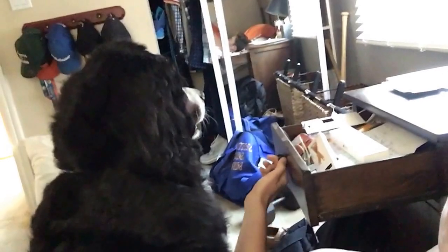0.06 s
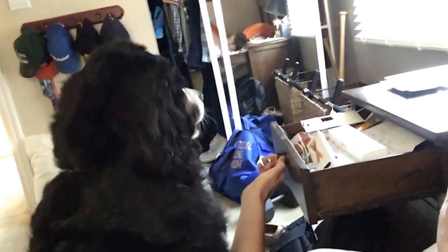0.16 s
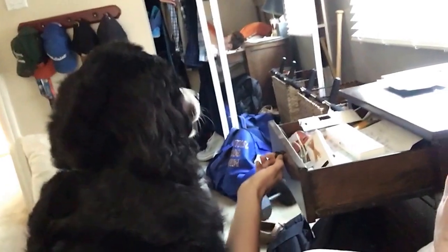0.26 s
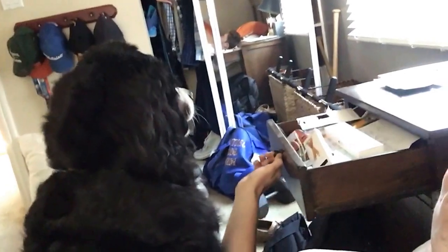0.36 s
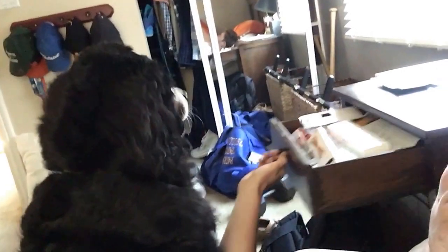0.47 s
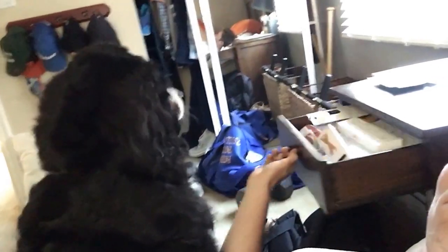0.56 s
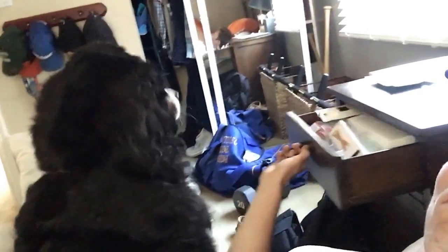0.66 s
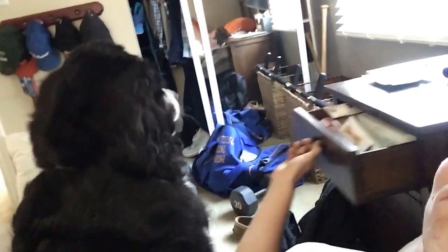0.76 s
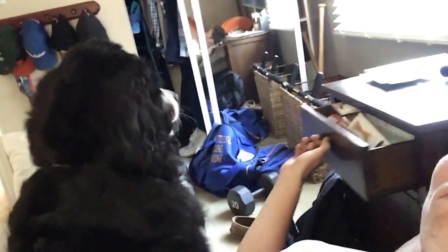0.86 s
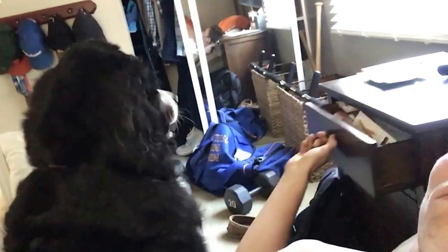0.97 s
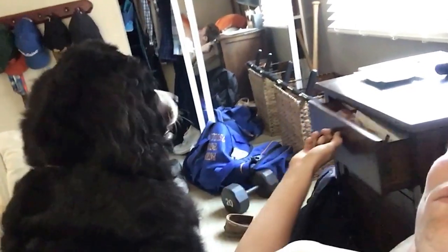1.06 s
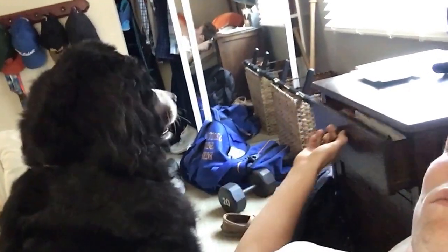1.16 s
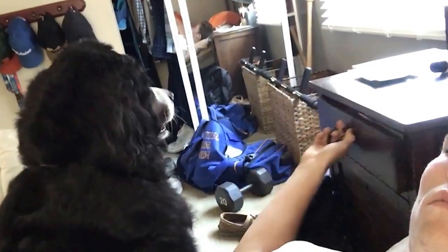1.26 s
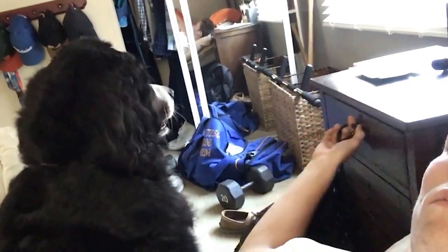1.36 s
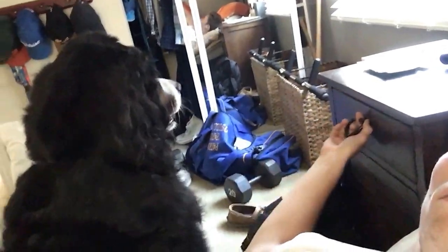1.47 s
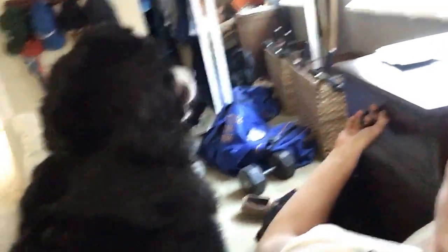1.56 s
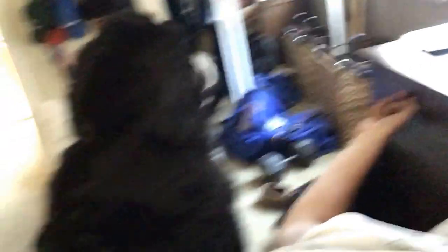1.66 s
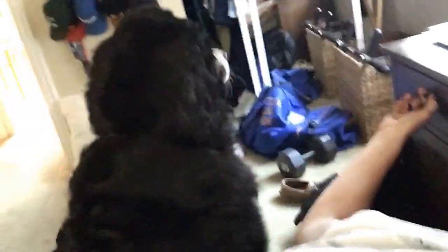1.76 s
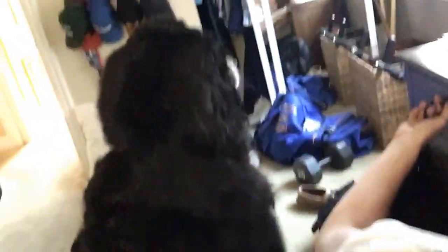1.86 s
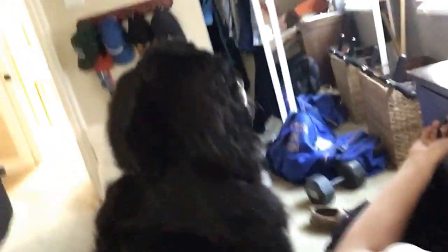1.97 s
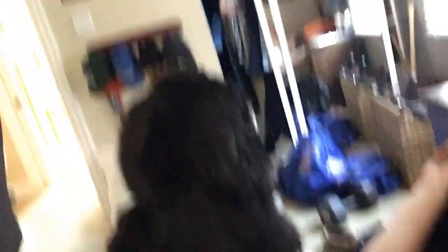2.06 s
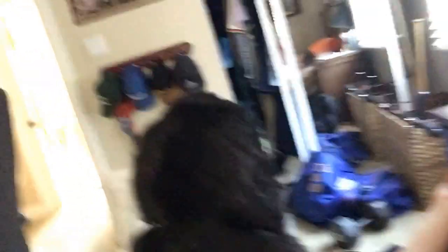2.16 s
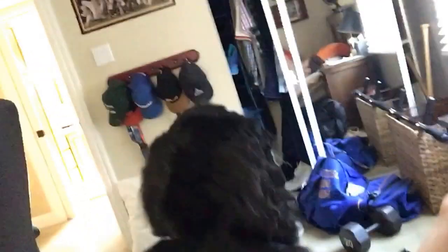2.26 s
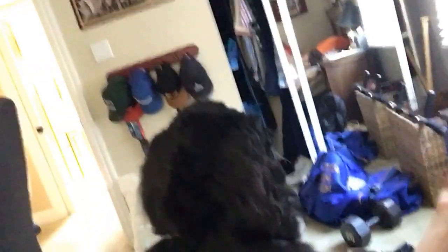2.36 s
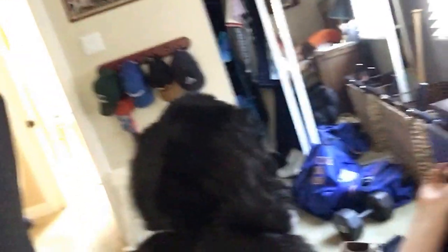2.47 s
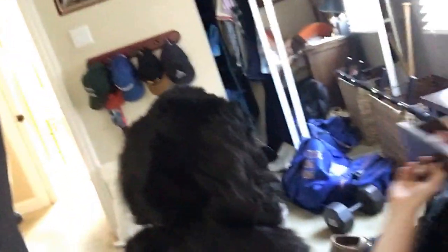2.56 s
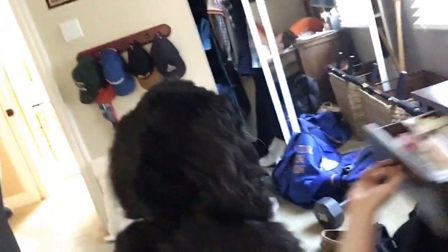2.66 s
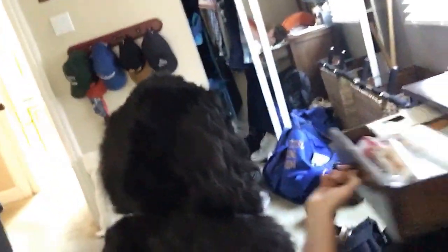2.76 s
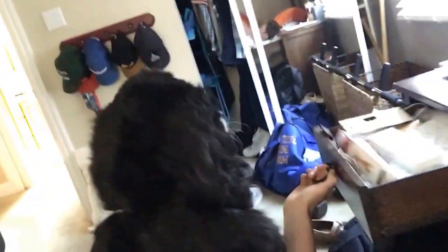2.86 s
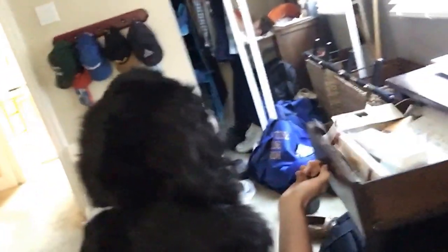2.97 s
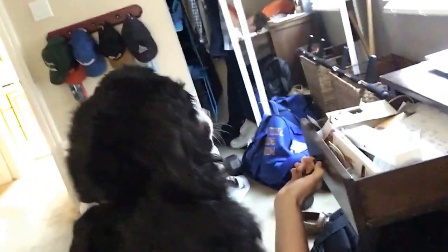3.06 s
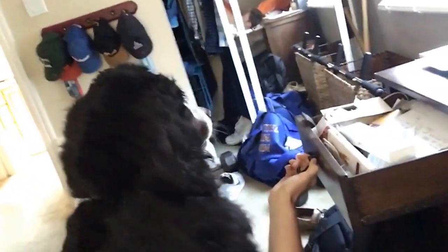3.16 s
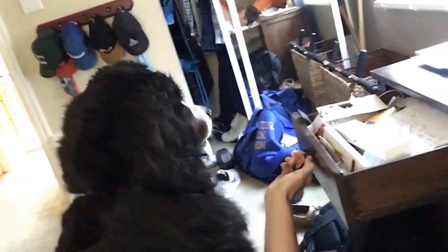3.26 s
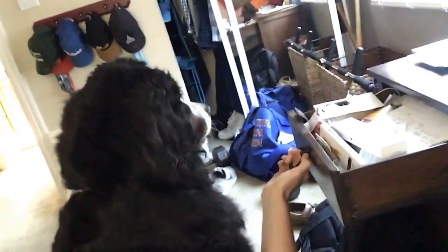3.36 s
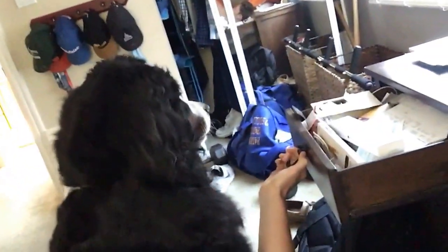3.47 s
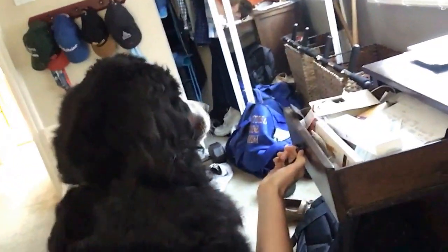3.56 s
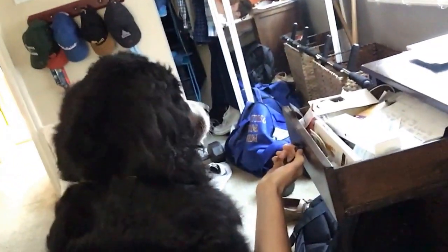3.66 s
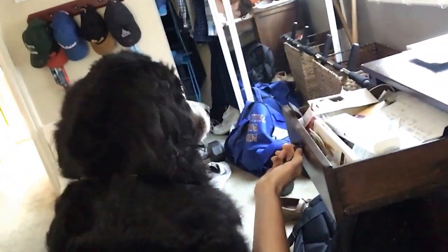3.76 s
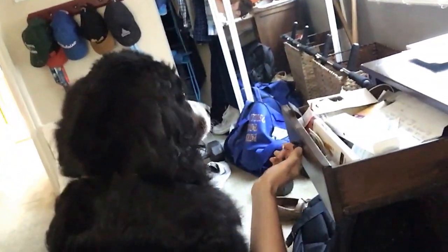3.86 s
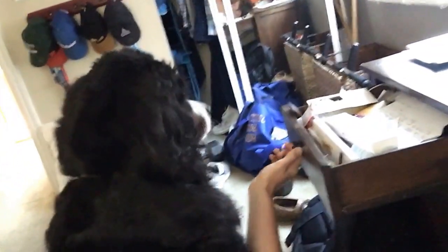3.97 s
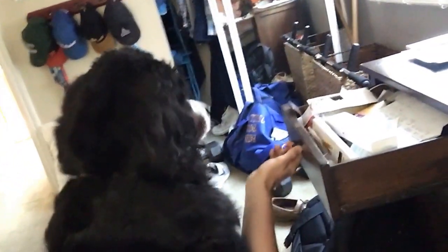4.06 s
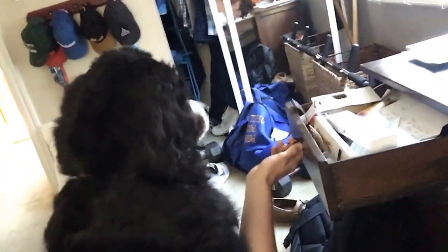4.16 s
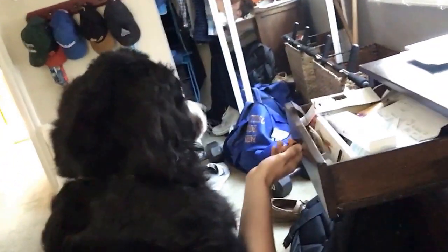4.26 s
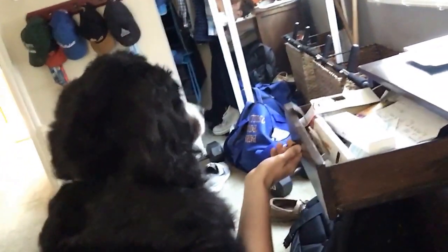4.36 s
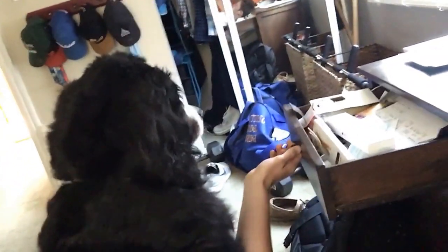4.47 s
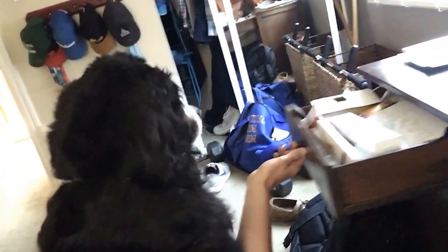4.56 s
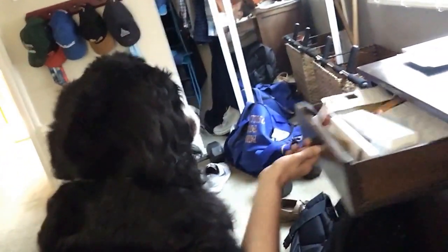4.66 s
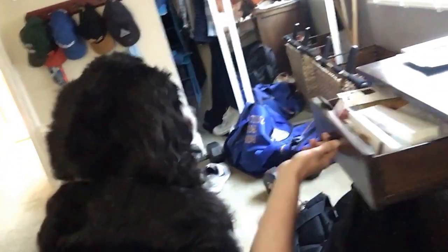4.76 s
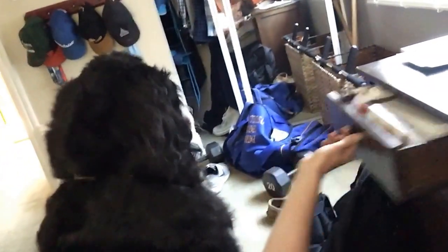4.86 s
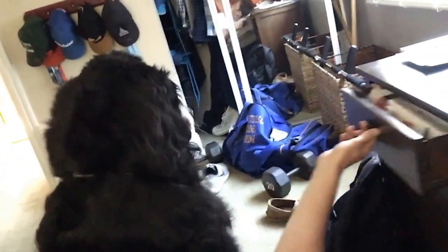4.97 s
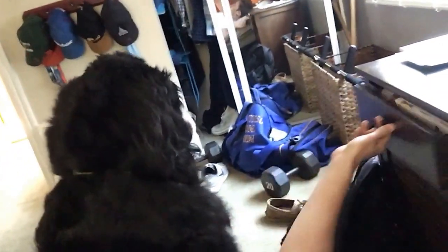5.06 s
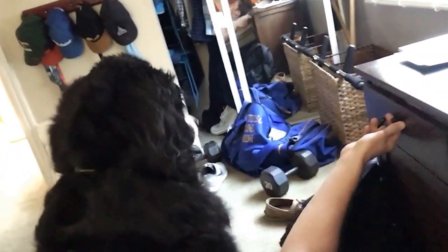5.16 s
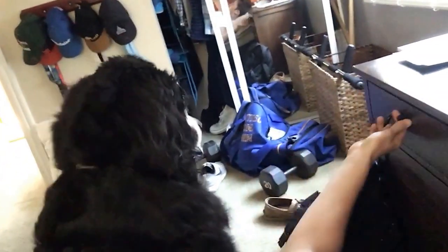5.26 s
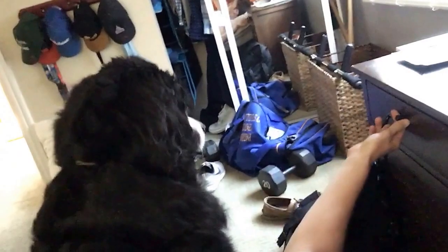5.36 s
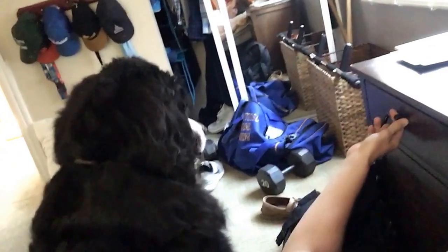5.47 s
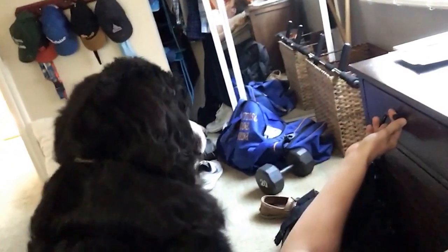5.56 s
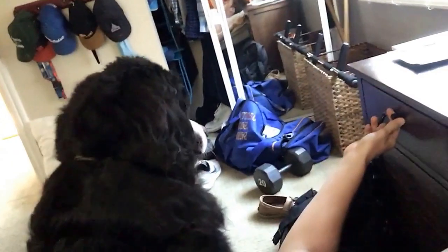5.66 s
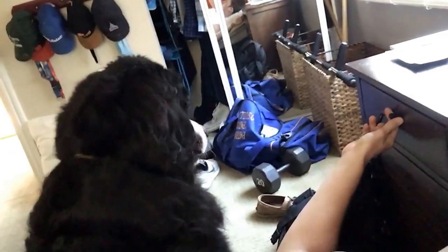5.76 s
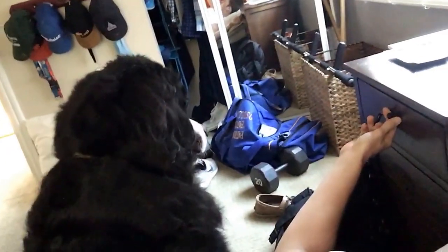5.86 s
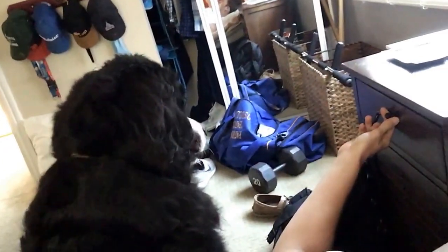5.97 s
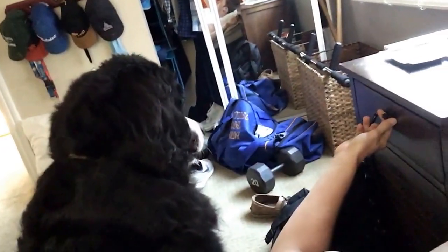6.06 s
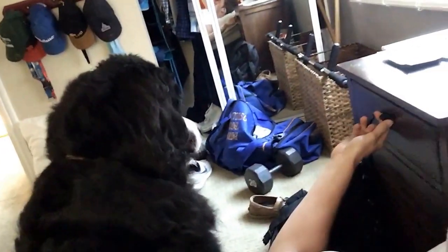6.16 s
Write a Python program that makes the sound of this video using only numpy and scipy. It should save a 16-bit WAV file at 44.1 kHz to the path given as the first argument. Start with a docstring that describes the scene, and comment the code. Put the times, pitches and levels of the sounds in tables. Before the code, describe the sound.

Heard at arm's length: a heavy drawer slides closed on dry runners, knocks, and something loose rocks hollowly. Near-silence with faint hum, then a quick swelling scrape and a very loud, bright wooden slam with rattling contents. Fingers click lightly on the pull; the drawer rasps and ticks back in, closing with a low thump. The bedroom adds a brief tail.

```python
"""Wooden desk drawer on its runners

A wooden drawer in a bedroom is pushed shut, pulled hard against its stop, and pushed shut again.
Rolling and scraping are trains of random slips, filtered and scaled by the effort of each stroke.
Stops, crashes, bumps and taps are blows: damped modes of the desk with noisy clacks and cracks.
A loose object rocks with hollow notes after each stroke; fingers click on the pull, and bright ticks
are scattered through. Room reflections, still air and a faint hum surround it all."""
import sys
import numpy as np
from scipy import signal
from scipy.fft import rfft, irfft
from scipy.io import wavfile
from scipy.ndimage import uniform_filter1d

SR = 44100
rng = np.random.default_rng(int(sys.argv[2]) if len(sys.argv) > 2 else 0)


def store_pcm(level_fs):
    """Save levels as 16-bit WAV."""
    pcm = np.round(np.clip(level_fs, -1, 1) * 32767).astype(np.int16)
    wavfile.write(sys.argv[1], SR, np.atleast_2d(pcm).T)


N = 273861

# Relative power spectra per Hz of the desk's rumble, of struck wood, and of a hard contact:
# frequency_hz, level_db
RUMBLE_SPECTRUM = [(20, -36), (35, -16), (60, -3), (90, -1), (125, 5), (190, 0.5), (260, -9.5),
                   (400, -19.5), (520, -38), (1200, -60.5)]
CLACK_SPECTRUM = [(100, -24.5), (260, 4), (400, -1), (520, -4), (700, -1), (1000, -1.5), (1250, -3),
                  (1600, -2), (2100, -6), (2800, -7), (5000, -32), (12000, -53.5)]
CRACK_SPECTRUM = [(1200, -23), (2500, -2), (3300, 0), (4250, 3), (5100, -5.5), (6300, -6), (7500, -15),
                  (8400, -17.5), (10500, -21), (14500, -22), (16000, -28.5)]


def amp(db):
    """Level law: converts decibels to an amplitude ratio."""
    return 10 ** (np.asarray(db) / 20)


def unit(x):
    """Normalization of power: scales a signal to an rms of 1."""
    return x / np.sqrt(np.mean(x ** 2) + 1e-20)


def read(points, hz):
    """Logarithmic frequency scale: interpolates (Hz, value) points along it."""
    f, value = np.transpose(points)
    return np.interp(np.log(hz + 1), np.log(f + 1), value)


def add(mix, s, sound):
    """Superposition: adds a sound to the mix from time s on, in place."""
    part = mix[max(round(s * SR), 0):][:len(sound)]
    part += sound[:len(part)]


def colour(x, points, peak_hz=1000, peak_db=0, size=4096):
    """Minimum-phase filtering by a spectrum and an optional broad resonance; white noise keeps its power."""
    hz = abs(np.fft.fftfreq(size, 1 / SR))
    resonance = peak_db / (1 + (np.log2((hz + 1) / peak_hz) / 1.2) ** 2)
    log_gain = np.log(amp(read(points, hz) + resonance))
    # the Hilbert transform of the log gain supplies the phase of a causal filter
    taps = np.fft.ifft(np.exp(np.conj(signal.hilbert(log_gain)))).real
    return signal.oaconvolve(x, taps / np.linalg.norm(taps))[:len(x)]


def ring(modes, rise):
    """Modal decay: damped sines of alternating sign that swell from rest over the time of contact."""
    t = np.arange(SR // 2) / SR
    sound = np.zeros(len(t))
    for k, (hz, db, t60) in enumerate(modes):
        sound += (-1) ** k * amp(db - 60 * t / t60) * np.sin(2 * np.pi * hz * t)
    initial_rms = np.sqrt(sum(amp(db) ** 2 for _, db, _ in modes) / 2)  # without the swell
    return sound * (1 - np.exp(-t / rise)) / initial_rms


def burst(decay):
    """Contact noise: a quick swell and a dying chatter of uneven bounces, of the same energy for any decay."""
    t = np.arange(SR // 8) / SR
    sizes_db = np.repeat(rng.standard_normal(len(t)), SR // 1000)[:len(t)]  # a new size every millisecond
    envelope = np.exp(-t / max(decay, 1e-4)) * (1 - np.exp(-t / .0004))
    sound = rng.standard_normal(len(t)) * amp(0.81 * sizes_db) * envelope
    return sound / np.linalg.norm(sound) * np.sqrt(0.0027 * SR)


def waver(hz):
    """Band-limited fluctuation: random motion of rms 1 with no component at or above hz."""
    spectrum = rfft(rng.standard_normal(N))
    return unit(irfft(spectrum * (np.fft.rfftfreq(N, 1 / SR) < hz), N))


def slips(per_s, spread_db):
    """Stick-slip friction as a random impulse train: tiny slips of chance size, scaled to an rms of 1."""
    size = amp(spread_db * np.minimum(rng.exponential(1, N), 3.5))
    happens = rng.random(N) < per_s / SR
    return unit(size * rng.standard_normal(N) * happens)


def controls():
    """Driven motion: effort and extra hiss of dry wood over time, in dB, fading outside each stroke."""
    # The drawer on its runners, one curve a stroke: time_s, effort_db, dryness_db
    push_shut = [(0.36, -47.5, 20.5), (0.46, -24, 0.5), (0.54, -11.5, 0.5), (0.7, -8.5, 0), (0.9, -18, 5),
                 (1.12, -20, 2), (1.24, -10, 4.5), (1.32, -13, 2.5), (1.39, -14.5, -3)]
    pull_open = [(2.2, -43.5, 16), (2.32, -26.5, -3), (2.41, -20.5, 4), (2.52, -10, 2.5),
                 (2.62, -2.5, -0.5), (2.75, 1, 4), (2.85, 1.5, -4)]
    push_again = [(4.12, -42.5, 1.5), (4.5, -38, 7), (4.63, -12, 2), (4.76, -9.5, -7.5), (4.86, -11, 8.5),
                  (5.01, -12.5, -0.5), (5.11, -7, 5), (5.18, -2, 11), (5.249, -10, 1), (5.33, -7, 5)]
    coast_db_per_s = 397.5  # fall of the effort outside a stroke
    t = np.arange(N) / SR
    strokes = push_shut, pull_open, push_again
    s, effort, dryness = np.concatenate(strokes).T
    # time to the nearest stroke, zero inside one
    idle_s = np.min([abs(t - np.clip(t, stroke[0][0], stroke[-1][0])) for stroke in strokes], axis=0)
    return np.interp(t, s, effort) - coast_db_per_s * idle_s, np.interp(t, s, dryness)


def slide():
    """Rolling and sliding friction: rumble, scrape, hiss and grit snaps; bumps in the track sway them together."""
    # Relative power spectra per Hz of the scraping runners and of their hiss: frequency_hz, level_db
    scrape_spectrum = [(150, -25), (330, -3.5), (400, 4), (500, -2.5), (660, 2), (800, -9), (950, 1),
                       (1250, 2.5), (1650, -5), (2100, -6), (2800, -13), (5000, -42), (12000, -65.5)]
    hiss_spectrum = [(1200, -36), (2600, 4.5), (3400, 2), (4200, -2), (5000, -6.5), (6300, -10.5),
                     (7600, -20), (9500, -19.5), (11000, -22), (15500, -24)]
    effort, dryness = controls()
    grit = slips(per_s=110, spread_db=2.74)
    rolling = slips(per_s=1700, spread_db=2.0)
    scraping = slips(per_s=1600, spread_db=-0.5) + 0.42 * grit
    hissing = slips(per_s=3400, spread_db=0.0) + 0.49 * grit
    # the factor on the effort is how closely a layer follows it, in dB per dB
    rumble = amp(-40.5 + 0.76 * effort) * colour(rolling, RUMBLE_SPECTRUM)
    scrape = amp(-47 + effort) * colour(scraping, scrape_spectrum)
    hiss = amp(-58 + effort + dryness) * colour(hissing, hiss_spectrum)
    # single grains snap under the runners and follow the effort only loosely
    grains = slips(per_s=85, spread_db=0.0)
    grain_clack = colour(grains, CLACK_SPECTRUM, peak_hz=1900, peak_db=9)
    snaps = amp(-64 + 0.75 * effort + dryness) * (colour(grains, CRACK_SPECTRUM) + 0.7 * grain_clack)
    return (rumble + scrape + hiss + snaps) * amp(2.6 * waver(hz=47.84))


def blow(thump_db, clack_db, crack_db, hz, chatter):
    """Impact excitation: a thump in the desk's modes, a clack in the struck piece and a crack at the contact."""
    # Low modes of the desk: frequency_hz, relative_level_db, t60_s
    desk_modes = [(62, -3.5, 0.26), (82.45, -8.5, 0.24), (109.3, 1.5, 0.1), (132.4, 1.5, 0.14),
                  (151.2, -1.5, .15), (196, -4.5, 0.32), (237, -2.5, 0.11), (309, -4.5, .1),
                  (397, -11.5, 0.1)]
    out = amp(thump_db) * ring(desk_modes, rise=.003)
    add(out, 0, amp(clack_db + 1) * colour(burst(chatter), CLACK_SPECTRUM, peak_hz=hz, peak_db=11.5))
    add(out, 0, amp(crack_db - 2) * colour(burst(0.55 * chatter), CRACK_SPECTRUM))
    return out


def rattle():
    """Multiple collisions: small hits among the jolted contents build up and die away."""
    rise_s, fall_db_per_s = 0.06, 191
    t = np.arange(SR // 2) / SR
    hits = slips(per_s=280, spread_db=-1.5)[:len(t)] * np.minimum(t / rise_s, 1)
    hits = hits * amp(-fall_db_per_s * np.maximum(t - rise_s, 0))
    clack, crack = colour(hits, CLACK_SPECTRUM), colour(hits, CRACK_SPECTRUM)
    return clack + amp(-10) * crack + amp(-9) * colour(hits, RUMBLE_SPECTRUM)


def stops(count=3):
    """Inelastic rebound: each end-stop blow repeats weaker, lower and duller while the contents rattle."""
    # The drawer reaches the end of its travel, levels relative:
    # start_s, thump_db, clack_db, crack_db, pitch_hz, rattle_db
    travel_ends = [(1.403, -23.5, -30, -34.5, 750, -53.5), (1.655, -47, -53.5, -71, 940, -68.5),
                   (2.854, -22.5, -21, -25, 1320, -31.5), (5.289, -24.5, -30, -42, 560, -49)]
    rebound_s, chatter_s, pitch_ratio = 0.0075, 0.011, 0.88
    thump_step_db, clack_step_db, crack_step_db = -11.5, -3, -5.5  # change at each rebound
    out = np.zeros(N)
    for s, thump_db, clack_db, crack_db, hz, rattle_db in travel_ends:
        for k in range(count):
            thump = thump_db + k * thump_step_db
            clack = clack_db + k * clack_step_db
            crack = crack_db + k * crack_step_db
            add(out, s + k * rebound_s, blow(thump, clack, crack, hz * pitch_ratio ** k, chatter_s))
        add(out, s, amp(rattle_db) * rattle())
    return out


def crashes():
    """Inertia: at full reach the contents are thrown against each other and the drawer's front."""
    # Collisions of the contents, levels relative: start_s, clack_db, crack_db, pitch_hz
    collisions = [(2.849, -25.5, -33, 1350), (2.871, -21.5, -21, 400), (2.882, -12, -11.5, 1460),
                  (2.891, -25.5, -12, 1274), (2.904, -14.5, -27, 710), (2.913, -17, -26, 1037),
                  (2.928, -26, -33.5, 1437)]
    out = np.zeros(N)
    for s, clack_db, crack_db, hz in collisions:
        add(out, s, blow(-38, clack_db, crack_db, hz, chatter=0.0086))
    return out


def catches():
    """Modal resonance: the stop at full reach sets the drawer's panels ringing."""
    # Moments at which the panels are caught: start_s, relative_level_db
    catch_times = [(2.882, -27.5), (2.904, -11), (2.913, -13)]
    # Modes of the drawer's panels and runners: frequency_hz, relative_level_db, t60_s
    panel_modes = [(607, -5, .05), (675, -4, .05), (783, 2, .06), (902, -9, .06), (1016, -6, .06),
                   (1062, -6, .06), (1113, -3, .07), (1468, -7, .06), (1590, -7, .06), (1668, -7, .05),
                   (4005, -14, .07), (4374, -12, .08)]
    out = np.zeros(N)
    for s, db in catch_times:
        add(out, s, amp(db - 4.5) * ring(panel_modes, rise=.0015))
    return out


def bumps():
    """Impulsive rolling contact: the rollers jolt over bumps in the track."""
    # Jolts, the thump and crack relative to the clack:
    # start_s, relative_level_db, thump_db, crack_db, pitch_hz, chatter_s
    jolts = [(0.524, -51.5, 3, -9, 1100, 0.01), (0.619, -45.5, 4.5, -16, 1300, 0.024),
             (0.797, -41.5, -16, -4, 1900, .004), (0.822, -35, -1.5, 2, 2300, 0.0027),
             (0.949, -43.5, -5.5, -9, 1230, 0.0033), (1.164, -50, -21, -1, 1460, 0.0062),
             (1.22, -44.5, -9, -7, 1610, 0.0053), (2.544, -40, -26, -0.5, 990, 0.0051),
             (2.705, -40.5, 0, -7, 1200, 0.0083), (2.717, -32.5, -15, -15, 1240, .02),
             (4.661, -30.5, -30, -15, 1370, 0.0053), (4.739, -45.5, 5, -19, 1090, 0.006),
             (4.805, -37.5, -6, -10.5, 1180, 0.014), (4.908, -32, -3, -3, 1510, 0.0051),
             (4.95, -41.5, -24, -0.5, 1400, 0.0084), (5.049, -36.5, -12, -10, 1480, 0.0027),
             (5.095, -38.5, -13, -8, 1690, 0.0022), (5.157, -32, -3, 0.5, 1630, 0.022)]
    out = np.zeros(N)
    for s, db, thump_db, crack_db, hz, chatter in jolts:
        add(out, s, blow(db + thump_db, db, db + crack_db, hz, chatter))
    return out


def taps():
    """Weak impact: things shift in the drawer and the hand brushes its front, hardly moving the desk."""
    # Light blows, the crack relative to the clack:
    # start_s, relative_level_db, crack_db, pitch_hz, chatter_s
    light_blows = [(0.052, -55, -30, 840, .008), (0.379, -58, -3, 1130, 0.024),
                   (1.477, -35.5, -12.5, 700, 0.0074), (2.249, -59, -13, 1140, 0.012),
                   (2.302, -61, -1, 2500, 0.0066), (2.346, -54, -24, 450, 0.0081),
                   (3.155, -34.5, -30, 792, 0.021), (3.293, -48.5, -22, 450, .02),
                   (3.875, -53, -17, 1080, 0.0096), (4.133, -56.5, -4, 1100, 0.021),
                   (4.226, -51, -7.5, 1040, 0.0081), (4.466, -57, -2, 1140, .011),
                   (4.512, -57, 2.5, 1900, 0.022), (5.402, -44.5, -29, 1000, 0.0059),
                   (5.462, -44, -22, 648, 0.015), (6.075, -60.5, -18, 1060, 0.028),
                   (6.124, -57.5, -20, 1220, 0.012)]
    out = np.zeros(N)
    for s, db, crack_db, hz, chatter in light_blows:
        add(out, s, blow(db - 12.5, db, db + crack_db, hz, chatter))
    return out


def rocking(count=2):
    """Energy loss in rocking: each landing gives a scuff and a hollow note, weaker and higher than the last."""
    # Swings of a loose object over and back: first_landing_s, relative_level_db, pitch_hz
    swings = [(1.519, -35.5, 264), (1.603, -47, 294), (3.163, -29, 228.5), (3.21, -35.5, 254),
              (3.297, -38.5, 321), (5.468, -36, 275), (5.563, -39.5, 238), (5.636, -50, 339)]
    # Relative power spectrum per Hz of the dull scuff: frequency_hz, level_db
    scuff_spectrum = [(150, -15), (380, -2.5), (700, -2), (1100, -4.5), (1700, -12), (4000, -30.5),
                      (9000, -50)]
    gap_s, loss_db, climb = 0.025, 2, 0.032  # per landing; the climb is a share of the first pitch
    out = np.zeros(N)
    for start, first_db, first_hz in swings:
        for k in range(count):
            s = start + k * gap_s
            db = first_db - k * loss_db
            hz = first_hz * (1 + k * climb)
            note = ring([(hz, 0, .09), (hz * 1.38, -8, .07)], rise=0.0024)
            add(out, s - .003, amp(db - 3.5) * note)  # the note leads the scuff slightly
            add(out, s, amp(db - 9.0) * colour(burst(decay=0.035), scuff_spectrum))
    return out


def pull():
    """Impact on a small resonator: a finger's tap rings the pull, with a crack and a clack of the front."""
    # Finger taps; soft touches ring lower: start_s, relative_level_db, pitch_hz, brightness_db
    finger_taps = [(1.987, -55, 464, -23), (4.164, -33, 1260, -4.5), (4.354, -40, 838, -27)]
    # Modes of the pull: pitch_multiple, relative_level_db, t60_s
    pull_modes = [(1, 0, .018), (1.33, -12, 0.021), (2.04, -17, .012), (3.33, -30, 0.014),
                  (4.3, -35, 0.011)]
    out = np.zeros(N)
    for s, db, hz, bright_db in finger_taps:
        modes = [(hz * multiple, level, t60) for multiple, level, t60 in pull_modes]
        add(out, s, amp(db) * ring(modes, rise=0.00011))
        add(out, s, amp(db + bright_db - 2.5) * colour(burst(decay=0.0016), CRACK_SPECTRUM))
        add(out, s, amp(db - 5) * colour(burst(decay=0.0029), CLACK_SPECTRUM, peak_hz=hz, peak_db=9.5))
    return out


def ticks():
    """Short contact, wide spectrum: hard little touches sound bright and dry."""
    # Tiny contacts, each sounding 0.85 ms after its listed time: nominal_s, relative_level_db
    contacts = [(0.379, -48), (0.5425, -40), (0.82, -36), (1.195, -53), (3.0235, -48), (4.1617, -27),
                (5.254, -38), (5.3306, -36)]
    out = np.zeros(N)
    for s, db in contacts:
        add(out, s + 0.00085, amp(db - 14.5) * burst(decay=0.00094))
    return colour(out, [(2000, -17.0), (7000, -14), (11000, -5.0), (16000, -4.0)])


def room_tail(first_gap, count=1400):
    """Reverberant decay: sparse reflections of random sign, each band dying at its own rate."""
    # Reverberation time of the room: frequency_hz, t60_s
    room_decay = [(60, 0.72), (250, 0.38), (700, 0.28), (1500, 0.33), (3000, 0.27), (6000, 0.29),
                  (14000, .19)]
    delay_s = abs(first_gap) + (np.arange(count) + rng.random(count)) / 2000  # 2000 reflections per second
    taps_out = np.zeros(SR)
    taps_out[(delay_s * SR).astype(int)] = rng.choice([-1., 1.], count)
    hz, t, z = signal.stft(taps_out, SR, nperseg=256)
    decay = amp(-60 * t / read(room_decay, hz)[:, None])
    tail = signal.istft(z * decay, SR, nperseg=256)[1]
    spectrum = [(60, -7.5), (180, -8.5), (400, -2.0), (1200, 0), (5000, -1.0), (16000, 3.0)]
    return colour(tail / np.linalg.norm(tail), spectrum)


def bedroom(x, wet_db):
    """Changing room paths: parts of the desk radiate in turn, so the sound moves between two random tails."""
    turn = 2 * np.pi * 7 * np.arange(N) / SR  # 7 turns per second
    paths = []
    for share in (np.cos(turn), np.sin(turn)):
        paths.append(signal.fftconvolve(x * share, room_tail(first_gap=.005))[:N])
    return amp(wet_db) * sum(paths)


def background():
    """Stationary noise and a tone: still air of the room with a faint, wavering mains hum."""
    # Relative power spectrum per Hz of the air: frequency_hz, level_db
    air_spectrum = [(12, -57), (20, -24.5), (44, -3), (91, -8), (123, -4.5), (146, -15), (198, -23.5),
                    (285, -18.5), (513, -24), (849, -22.5), (1330, -27), (1570, -26), (1810, -29),
                    (6010, -36), (16000, -51.5)]
    air = amp(-67.5) * colour(rng.standard_normal(N), air_spectrum)
    hum = np.sqrt(2) * np.sin(2 * np.pi * 121 * np.arange(N) / SR) * amp(1.3 * waver(hz=4))
    return air + amp(-79.5) * hum


def scene():
    """Direct and reflected sound at an arm's length; the pull faces the microphone, so it excites the room less."""
    drawer = slide() + stops() + crashes() + catches() + bumps() + taps() + rocking()
    clicks = pull()
    reflections = bedroom(drawer + amp(-3.0) * clicks, wet_db=-1.5)
    return (drawer + clicks + ticks() + reflections + background())[None]


def limiter(x, threshold_db, level_fall_db_per_s):
    """Gain control by a held level: it ducks at once under a loud sound and recovers slowly."""
    power_db = 10 * np.log10(abs(uniform_filter1d(x[0] ** 2, size=200)) + 1e-12)
    fall = np.arange(N) / SR * level_fall_db_per_s
    held_db = np.maximum.accumulate(power_db + fall) - fall  # a peak level that sinks steadily
    over_db = np.maximum(held_db - threshold_db, 0)
    return x / amp(0.59 * uniform_filter1d(over_db, size=100))  # takes off 0.59 dB per dB of excess


def record(dry):
    """Transducer limits: deep bass is shed, gain control holds the slam down, peaks round off, the band ends."""
    thin = signal.sosfilt(signal.butter(2, 35, "highpass", fs=SR, output="sos"), dry)
    held = limiter(thin, threshold_db=-21, level_fall_db_per_s=11.0)
    ceiling = 0.71
    rounded = ceiling * np.tanh(held / ceiling)
    low_pass = signal.firwin(511, 15950, window=("kaiser", 9), fs=SR)  # cutoff in Hz
    return signal.oaconvolve(rounded, low_pass[None], "same")


dry = scene()
out = record(dry)
store_pcm(out)
```